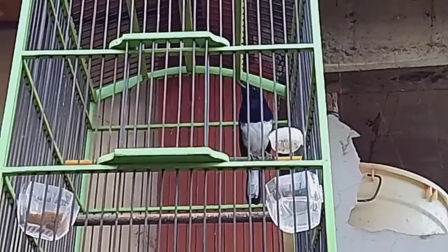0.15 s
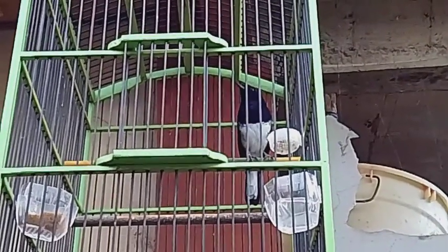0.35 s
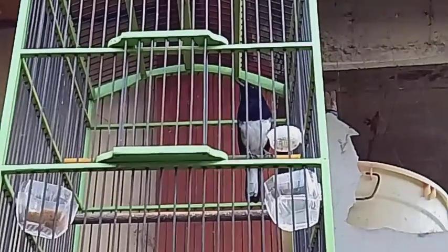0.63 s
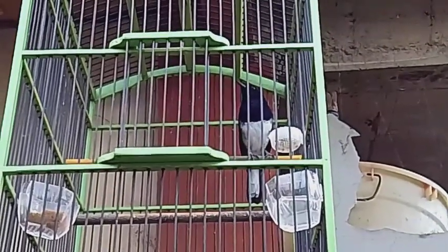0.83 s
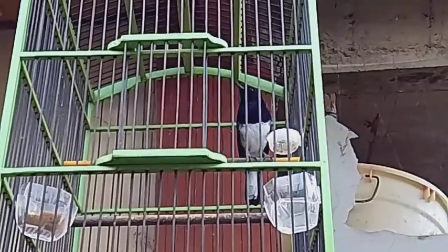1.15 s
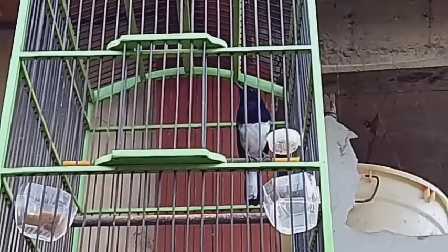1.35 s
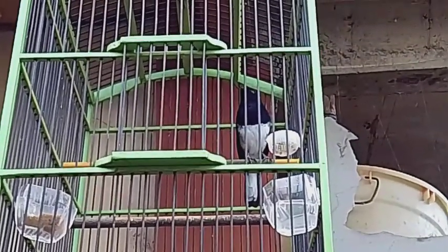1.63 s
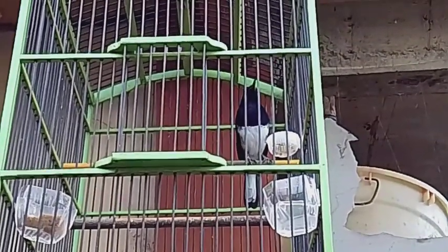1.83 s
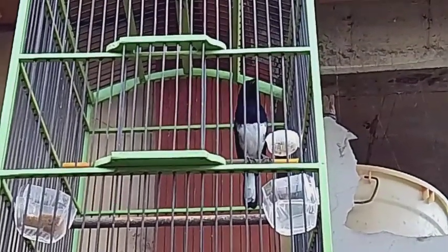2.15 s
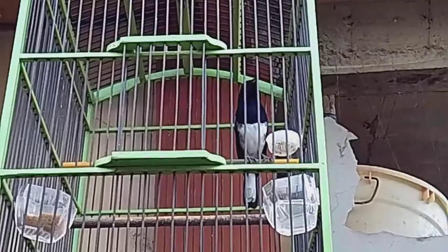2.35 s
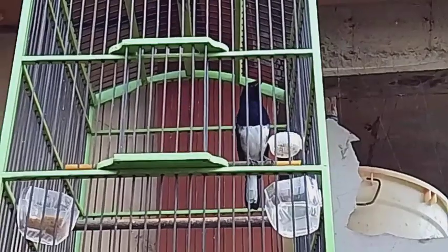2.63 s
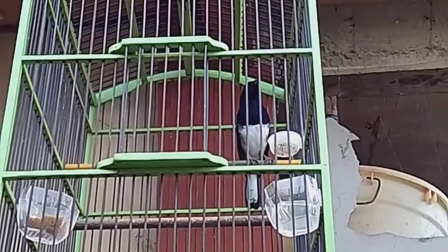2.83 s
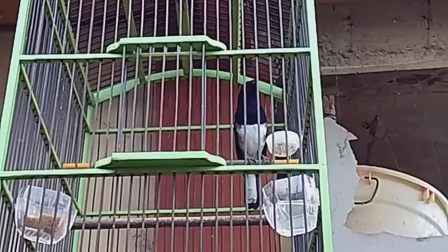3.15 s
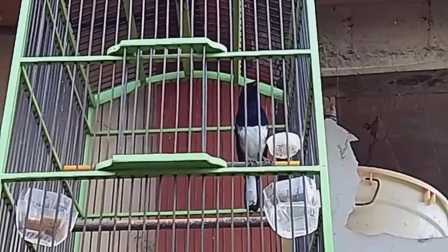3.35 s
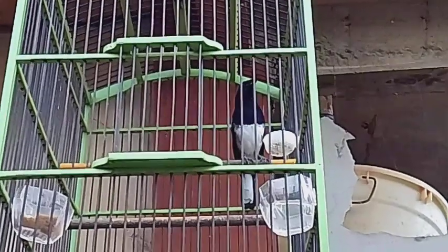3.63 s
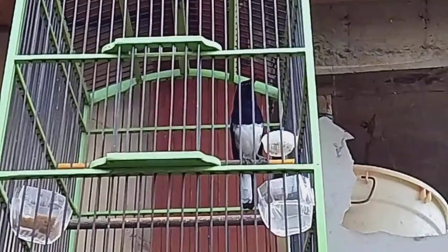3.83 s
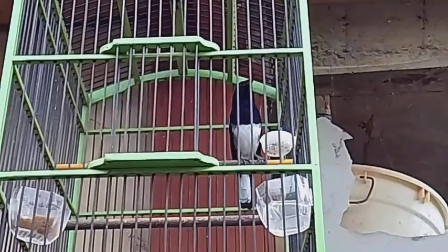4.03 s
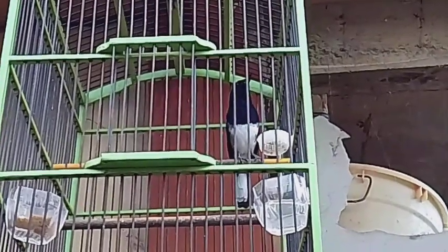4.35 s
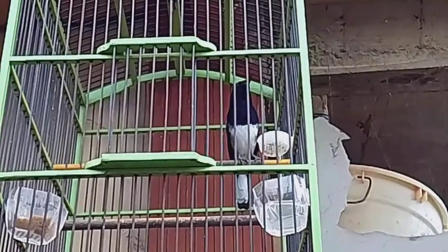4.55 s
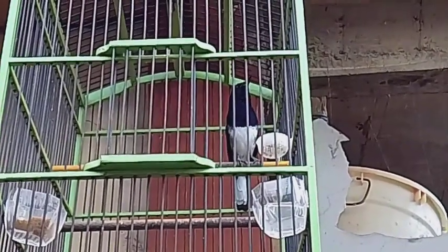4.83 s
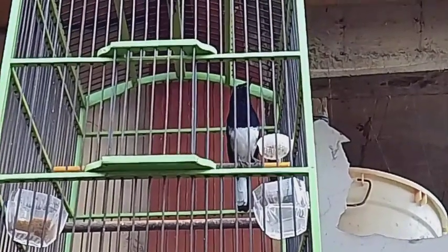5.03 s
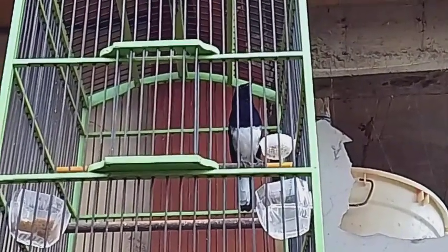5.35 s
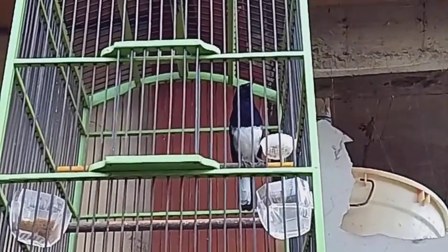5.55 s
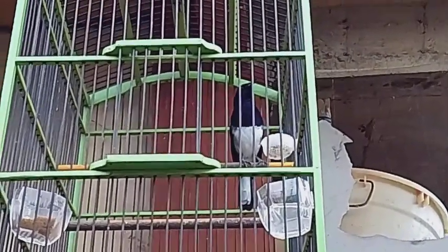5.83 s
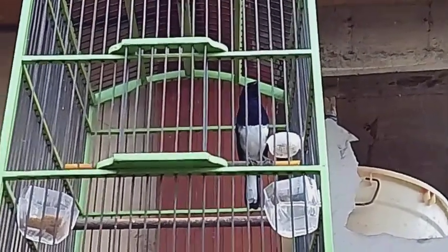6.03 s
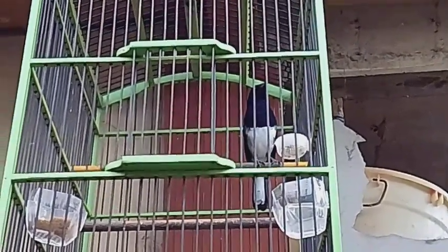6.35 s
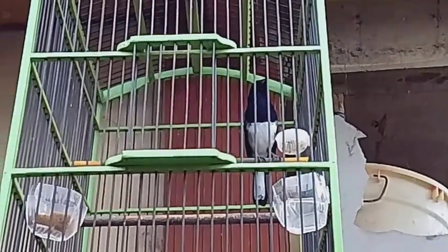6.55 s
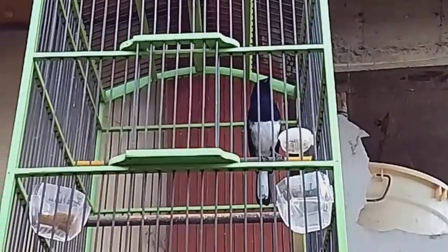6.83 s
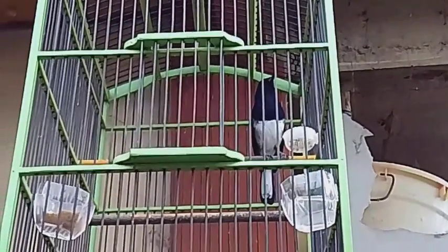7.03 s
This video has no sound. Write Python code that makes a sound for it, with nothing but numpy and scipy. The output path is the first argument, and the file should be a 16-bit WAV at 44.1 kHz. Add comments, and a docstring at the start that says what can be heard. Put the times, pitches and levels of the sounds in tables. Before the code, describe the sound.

Under a roof in a yard, a nearby caged songbird delivers about three seconds of loud, varied song, with gliding whistles, whip-like flicks and raspy notes, briefly echoed by the walls. Before and after it, more distant birds give soft hoarse calls and rising whistles among scattered small ticks. Behind everything, a cicada buzzes thinly and far traffic hums very quietly.

```python
"""Caged magpie-robin under the eaves

A magpie-robin's syrinx glides through one loud phrase of whistles, whips and reedy notes.
Softer calls of other birds fill the pauses, a cicada's drum buzzes high up, a motor hums in far
traffic, and short ticks and clicks sound now and then. Walls and roof throw the song back,
and a limiter flattens its loudest notes."""
import sys
import numpy as np
from scipy import signal
from scipy.fft import rfft, irfft, next_fast_len
from scipy.io import wavfile

SR = 44100
rng = np.random.default_rng(int(sys.argv[2]) if len(sys.argv) > 2 else 0)


def inscribe(sig):
    """Save sig as 16-bit PCM at rate SR to the path in sys.argv[1].

    A 1-D sig is mono; a 2-D sig holds one channel per row.
    Samples are clipped to [-1, 1] before scaling.
    """
    pcm = np.round(np.clip(np.atleast_2d(sig).T, -1, 1) * 32767)
    wavfile.write(sys.argv[1], SR, pcm.astype(np.int16))


N = 317079
TIME = np.arange(N) / SR
CUTOFF_HZ = 15550

# Spectrum of the noise shed by fast sweeps. Each row: frequency in Hz, gain in dB.
AIR_SPECTRUM = [(60, -3), (300, 2), (900, 3), (3000, 11.5), (6000, 1), (10000, 1.5), (15000, -7.5)]


def from_db(db):
    """Amplitude grows tenfold for every 20 dB."""
    return 10 ** (np.asarray(db) / 20)


def unit_rms(x):
    """Normalisation to a mean power of 1."""
    return x / np.sqrt(np.mean(x ** 2) + 1e-20)


def db_at(spectrum, hz):
    """Interpolation of a spectrum on a logarithmic frequency axis."""
    freq, db = np.transpose(spectrum)
    return np.interp(np.log(np.maximum(hz, 1)), np.log(freq), db)


def coloured(x, spectrum):
    """Filtering by multiplication in the frequency domain."""
    size = next_fast_len(len(x))
    gain = from_db(db_at(spectrum, np.fft.rfftfreq(size, 1 / SR)))
    return irfft(rfft(x, size) * gain, size)[:len(x)]


def drift(rate, size):
    """Random modulation: straight lines join `rate` Gaussian values a second."""
    position = np.arange(size) / SR * rate
    count = int(position[-1]) + 2
    return np.interp(position, np.arange(count), rng.standard_normal(count))


def ramp(t, start, length):
    """A linear transition from 0 at `start` to 1 after `length`."""
    return np.clip((t - start) / max(length, 1 / SR), 0, 1)


def note_span(start, length, open_s=.0015, close_s=.003):
    """Tapered edges prevent clicks; gives a note's sample indices, elapsed time and gate."""
    at = np.arange(max(int(start * SR), 0), min(int((start + length) * SR), N))
    t = (at - at[0]) / SR
    edge = np.clip(np.minimum(t / open_s, (t[-1] - t) / close_s), 0, 1)
    return at, t, np.sin(edge * np.pi / 2) ** 2


def phase_of(hz):
    """Phase is the time integral of frequency."""
    return 2 * np.pi * np.cumsum(hz) / SR


def town(traffic_db=-57, motor_hz=340.5, motor_db=-66):
    """Far traffic sums to steady noise; a motor's hum wavers in frequency and amplitude."""
    # Spectrum of the traffic. Each row: frequency in Hz, relative level in dB.
    traffic_spectrum = [(25, -27.5), (70, -10.5), (160, -19), (190, 0.5), (235, -3), (350, 3), (520, -6),
                        (900, -5), (1400, -8), (2800, 1), (4000, -11.5), (6000, -13.5), (9000, -21.5),
                        (13000, -39.5)]
    traffic = from_db(traffic_db) * unit_rms(coloured(rng.standard_normal(N), traffic_spectrum))
    hum = np.sin(phase_of(motor_hz * (1 + .008 * drift(34, N))))
    return traffic + from_db(motor_db + 2 * drift(2.4, N)) * hum


def cicada(pulse_hz=99, level_db=-59.5, lull_db=6, ramp_s=.15):
    """Pulsed excitation: the drum buckles in a fast train of bursts that ring in its resonance."""
    # Resonance of the drum. Each row: frequency in Hz, relative level in dB.
    tymbal_spectrum = [(5000, -33.5), (6400, -12), (7300, -6), (7540, 3), (7750, -5), (8350, -7),
                       (8750, -24), (10500, -40.5), (13000, -45), (15300, -22.5)]
    # Bouts of louder buzzing. Each row: start in seconds, length in seconds.
    bouts = [(0, 0.68), (1.2, .58), (2.328, 1.45), (4.746, .5), (5.864, 0.54), (6.95, .24)]
    cycle = np.cumsum(pulse_hz * (1 + .0083 * drift(11, N))) / SR % 1
    bursts = (.5 + np.exp(-1.8 * cycle)) * rng.standard_normal(N)
    effort = sum(ramp(TIME, start - ramp_s, ramp_s) - ramp(TIME, start + length, ramp_s)
                 for start, length in bouts)
    return from_db(level_db - lull_db * (1 - effort)) * unit_rms(coloured(bursts, tymbal_spectrum))


def ticks(snap_band_hz=(1000, 4000), snap_t60_s=.038, ring_t60_s=.022, rise_s=.00069):
    """Damped transients: each tick is a snap of noise and a ring, both decaying exponentially."""
    # Short ticks and clicks: one at the very start, two as the song begins, and scattered light taps.
    # Each row: start in seconds, ring level in dB, ring pitch in Hz, snap level in dB.
    clicks = [(.002, -28.5, 1836, -33.5), (.477, -26, 785, -25.5), (.49, -38, 690, -42),
              (0.675, -54, 1200, -43), (0.817, -62, 1900, -39), (.904, -34.5, 1850, -35.5),
              (1.529, -41, 1534, -56), (1.578, -34.5, 1680, -38), (1.839, -40.5, 483, -53),
              (2.052, -23.5, 3190, -41), (2.066, -25.5, 2020, -39), (5.376, -26, 2190, -39.5),
              (5.571, -41, 1391, -49.5), (5.857, -33, 1830, -38), (6.171, -46.5, 2450, -39.5),
              (6.889, -43, 1457, -49), (6.964, -41, 3960, -37)]
    out, t = np.zeros(N), TIME[:SR // 5]
    band = signal.butter(2, snap_band_hz, "band", fs=SR, output="sos")
    for start, ring_db, hz, snap_db in clicks:
        snap = signal.sosfilt(band, rng.standard_normal(len(t)) * from_db(-60 * t / snap_t60_s))
        ring = np.sin(2 * np.pi * hz * t) * from_db(-60 * t / ring_t60_s) * (1 - np.exp(-t / rise_s))
        at = int(start * SR)
        out[at:at + len(t)] += from_db(snap_db) * snap + from_db(ring_db) * ring
    return out


def far_chatter(count=220, low_hz=1300, high_hz=4800, length_s=.042, floor_db=-61.25, range_db=9):
    """Fast random frequency modulation makes hoarse scraps of chatter from many faint birds."""
    out, progress = np.zeros(N), np.linspace(0, 1, int(length_s * SR))
    size = len(progress)
    envelope = np.minimum(10 * progress, 1) * (1 - progress)
    for when, pitch, loudness in rng.random((count, 3)):
        hz = low_hz * (high_hz / low_hz) ** pitch * (1 + .13 * drift(2500, size))
        at = int(when * (N - size))
        out[at:at + size] += from_db(floor_db + range_db * loudness) * envelope * np.sin(phase_of(hz))
    return out


def syllable(start, to_turn, after, first_hz, turn_hz, last_hz, db, octave_db, attack, fade_db):
    """A power-law glide flattens at its turning pitch; the level climbs, then fades or swells."""
    at, t, gate = note_span(start, to_turn + after)
    approach = (1 - ramp(t, 0, to_turn)) ** 2.3
    departure = ramp(t, to_turn, after) ** 2.3
    hz = turn_hz + (first_hz - turn_hz) * approach + (last_hz - turn_hz) * departure
    effort_db = -20.5 * (1 - ramp(t, 0, attack)) - fade_db * ramp(t, attack, to_turn + after - attack)
    # The octave follows only part of the swell and fade, so the quiet edges are reedier.
    return at, gate, hz, db + effort_db, octave_db + .44 * effort_db


def chip(start, first_hz, db, length_s=.057, lift=.244, fade_db=20, roughness=.068):
    """A linear upward chirp: a sudden low note lifts as it decays."""
    at, t, gate = note_span(start, length_s)
    hz = first_hz * (1 + lift * t / length_s)
    level_db = db - fade_db * t / length_s
    return at, gate, hz, level_db, level_db - 8, roughness


def riser(start, length, first_hz, db, top_hz=2685, attack_s=.22, roughness=.1):
    """A slow power-law glide: the whistle swells as it climbs and levels off at the top."""
    at, t, gate = note_span(start, length)
    hz = top_hz + (first_hz - top_hz) * (1 - ramp(t, 0, length)) ** 1.3
    level_db = db - 15.5 * (1 - ramp(t, 0, attack_s)) - 3.5 * ramp(t, attack_s, length - attack_s)
    return at, gate, hz, level_db, level_db - 38, roughness


def twitter(start, db, length_s=.1281, first_hz=4160, last_hz=4110, fade_db=9.5, roughness=.36):
    """A shallow downward chirp: a thin rough note sinks as it decays."""
    at, t, gate = note_span(start, length_s)
    hz = first_hz + (last_hz - first_hz) * t / length_s
    level_db = db - fade_db * t / length_s
    return at, gate, hz, level_db, level_db - 21, roughness


def far_birds(rasp=.13, upper_db=-21, flutter_db=2.5):
    """Random frequency modulation roughens soft whistles; harmonics make some of them reedy."""
    # Hoarse calls. Each row: start, time to the turn and time after it in seconds; first, turning and
    # last pitch in Hz; fundamental and octave level in dB; attack in seconds; fade in dB; roughness.
    hoarse_calls = [ (.05, 0.092, 0.061, 2600, 2896, 2990, -44, -56.5, 0.044, 12, 1.14),
                    (.19, 0.17, 0.022, 2046, 2350, 2350, -58.5, -87, 0.018, -6, 0.27),
                    (.31, 0.086, 0.048, 2450, 2600, 2190, -37, -86, 0.056, 1.5, 0.18),
                    (4.422, 0.018, 0.049, 3100, 3070, 2850, -31.5, -47, 0.058, -1.5, 0.54),
                    (5.151, 0.027, 0.095, 2080, 2029, 1725, -44, -77, 0.012, 8, 0.02),
                    (5.781, 0.1, 0.011, 2650, 2249, 2460, -46, -79, 0.036, 6, 0.22),
                    (5.855, 0.0196, 0.052, 2535, 2503, 2136, -46, -70.5, 0.014, -4, 0.31),
                    (6.356, 0.042, 0.089, 2864, 2940, 2477, -35.5, -54, 0.033, 11, 0.07),
                    (6.45, .07, 0.0367, 2750, 2530, 2577, -43.5, -45, 0.026, 0.5, 0.26),
                    (7.1, 0.076, 0.0066, 2380, 2563, 2600, -39, -61, 0.11, 7, 0.24), ]
    # Low chips. Each row: start in seconds, first pitch in Hz, level in dB.
    chips = [(0.057, 1007, -46.5), (0.814, 936, -46.5), (6.1, 994, -51), (6.528, 1451, -40),
             (6.89, 1018, -46.5)]
    # Rising whistles. Each row: start and length in seconds, first pitch in Hz, level in dB.
    risers = [(0.989, .375, 1762, -36.5), (6.468, .42, 1698, -39)]
    # Thin twitters. Each row: start in seconds, level in dB.
    twitters = [(5.758, -61.5), (6.02, -60.5), (6.279, -56.5)]
    calls = [(*syllable(*row), roughness) for *row, roughness in hoarse_calls]
    calls += [riser(*row) for row in risers]
    calls += [chip(*row) for row in chips]
    calls += [twitter(*row) for row in twitters]
    out = np.zeros(N)
    for at, gate, hz, fundamental_db, octave_db, roughness in calls:
        phase = phase_of(hz * (1 + rasp * roughness * drift(700, len(at))))
        overtones = np.sin(2 * phase) + from_db(upper_db) * (np.sin(3 * phase) + np.sin(4 * phase))
        voice = from_db(fundamental_db) * np.sin(phase) + from_db(octave_db) * overtones
        flutter = from_db(flutter_db * drift(50, len(at)))
        out[at] += np.sqrt(2) * gate * flutter * voice
    return out


def long_whistle(start, length, top_hz, low_hz, scoop_hz, octave_db, levels,
                 first_hz=2543, rise_s=.112, sag_hz_per_s=1080, droop_s=.135, scoop_s=.03):
    """Slow frequency modulation: a rise, sag, droop and scoop; the octave grows towards the end."""
    at, t, gate = note_span(start, length)
    rise = np.sin(np.pi / 2 * ramp(t, 0, rise_s)) ** 2
    sag_hz = sag_hz_per_s * np.clip(t - rise_s, 0, length - droop_s - rise_s)
    droop = ramp(t, length - droop_s, droop_s - scoop_s)
    scoop = ramp(t, length - scoop_s, scoop_s) ** 2
    held_hz = first_hz + (top_hz - first_hz) * rise - sag_hz
    hz = held_hz + (low_hz - held_hz) * droop + scoop_hz * scoop
    onset_db = -2 * (1 - ramp(t, 0, .048))
    fundamental_db = onset_db + np.interp(at / SR, *np.transpose(levels))
    return at, gate, hz, fundamental_db, octave_db + onset_db + 6 * (droop + scoop)


def magpie_robin(tremor_db=2, flutter_db=4, buzz_db=-16, db_per_harmonic=-1.5, air_db=-39):
    """Source and filter: the syrinx glides; the throat passes the fundamental or a reedy octave."""
    # Long whistles that open and close the phrase. Each row: start and length in seconds,
    # top pitch, lowest pitch and final lift in Hz, octave level in dB.
    whistles = [(2.06, .465, 2827, 2159, 450, -51), (4.453, .485, 2789, 2283, 153, -50)]
    # One envelope for each whistle. Each point: time in seconds, level in dB.
    envelopes = [
        [(2.06, -37.5), (2.084, -21.5), (2.136, -8), (2.352, -10), (2.358, -22), (2.4, -9), (2.412, -21),
         (2.51, -26), (2.52, -13.5)],
        [(4.455, -25), (4.503, -13), (4.643, -6), (4.701, -25.5), (4.715, -12.5), (4.767, -29.5), (4.781, -11),
         (4.887, -25), (4.935, -23)],
    ]
    # Quick syllables. Each row: start, time to the turn and time after it in seconds; first, turning
    # and last pitch in Hz; fundamental and octave level in dB; attack in seconds; fade in dB.
    syllables = [ (2.523, 0.016, 0.019, 2606, 3722, 2830, -3.5, -50, 0.0068, 8),
                 (2.7273, 0.03, 0.0079, 3573, 2343, 2550, 1, -36.5, 0.0032, 13.5),
                 (2.782, 0.028, 0.0035, 2830, 1595, 1600, -6, -42, 0.0031, 35),
                 (2.985, 0.022, 0.066, 1280, 1472, 1282, -36.5, -44.5, 0.0075, -4),
                 (3.058, 0.021, 0.042, 1297, 1378, 1244, -31, -28.5, 0.026, 6),
                 (3.077, 0.027, 0.011, 1494, 1660, 1700, -40.5, -28.5, 0.0062, 4.5),
                 (3.092, 0.062, 0.06, 1890, 2075, 2044, -10.5, -56.5, 0.021, 5),
                 (3.222, 0.0037, 0.039, 1675, 1837, 2446, -20, -44.5, 0.021, -2.5),
                 (3.266, 0.039, 0.1, 2367, 2617, 2490, -1.5, -48, 0.019, 14.5),
                 (3.49, 0.024, 0.027, 2930, 2966, 2750, -40.5, -53.5, 0.022, 2.5),
                 (3.5393, .016, .029, 1476, 1649, 1466, -28.5, -18.5, 0.0031, 0.5),
                 (3.583, 0.0095, 0.044, 1743, 1958, 1554, -23, -34, 0.012, 4.5),
                 (3.635, 0.0036, .012, 2790, 3197, 1806, 2.5, -34.5, 0.0043, 9.5),
                 (3.654, 0.018, 0.023, 1730, 1732, 1582, -26, -13.5, 0.0071, 3),
                 (3.826, .022, 0.01, 1164, 1879, 1858, -24.5, -7.5, 0.028, 5),
                 (3.854, .017, 0.012, 1716, 1737, 1600, -23, -6.5, 0.004, 4.5),
                 (3.872, 0.059, 0.051, 2660, 2817, 2355, 0, -39.5, 0.017, 9.5),
                 (4.002, .028, .028, 2643, 3221, 2755, -1, -50.5, 0.023, 3.5),
                 (4.055, 0.0058, 0.039, 2680, 2558, 2386, -12, -38.5, 0.0029, -1.5),
                 (4.091, 0.0029, 0.019, 2450, 2410, 1590, -5.5, -36, 0.0047, 21),
                 (4.149, 0.087, .035, 5460, 5835, 5710, -63.5, -82, 0.013, -17.5),
                 (4.238, 0.035, 0.0084, 3610, 5636, 5100, -15.5, -46, 0.0029, 7),
                 (4.28, 0.031, 0.018, 4200, 2504, 2320, -1, -44.5, 0.0043, 8),
                 (4.33, 0.015, .018, 2533, 2794, 2410, -11.5, -46, 0.0099, 7.5),
                 (4.938, 0.016, 0.011, 2400, 3431, 3000, -2.5, -56, 0.011, 15), ]
    # Weighting of the harmonics above the octave. Each row: frequency in Hz, gain in dB.
    overtone_spectrum = [(3500, -14.5), (4900, -21.5), (6600, -32.5), (8300, -29.5), (10500, -30),
                         (12200, -42), (13800, -29.5), (15500, -40.5)]
    notes = [long_whistle(*row, levels) for row, levels in zip(whistles, envelopes)]
    notes += [syllable(*row) for row in syllables]
    out = np.zeros(N)
    for at, gate, hz, fundamental_db, octave_db in notes:
        fundamental = from_db(fundamental_db + tremor_db * drift(60, len(at)))
        octave = from_db(octave_db + tremor_db * drift(60, len(at)))
        # Held notes are nearly pure; reedy ones rasp; fast sweeps are unsteady and shed noise.
        sweep = np.tanh(np.abs(np.gradient(np.log(hz))) * SR / 35)
        reediness = octave / (fundamental + octave)
        waver = .0022 + .018 * sweep + .0099 * reediness
        hz = hz * (1 + waver * drift(430, len(at)))
        phase = phase_of(hz)
        voice = fundamental * np.sin(phase) + octave * np.sin(2 * phase)
        buzz = octave + from_db(buzz_db) * fundamental   # reedy notes carry far more overtones
        for k in range(3, 10):
            overtone_db = db_at(overtone_spectrum, k * hz) + db_per_harmonic * (k - 2)
            overtone_db += flutter_db * drift(80, len(at))
            voice += buzz * from_db(overtone_db) * (k * hz < CUTOFF_HZ) * np.sin(k * phase)
        air = coloured(rng.standard_normal(len(at)), AIR_SPECTRUM)
        voice += from_db(air_db) * (fundamental + octave) * sweep * air
        out[at] += np.sqrt(2) * gate * voice
    return out


def whip_cracks():
    """Broadband transients: the hardest flicks of the song break into short bursts of noise."""
    # Gaussian bursts. Each row: centre in seconds, level in dB, half width in seconds.
    cracks = [(2.53, -28, 0.0019), (2.728, -34.5, 0.0015), (2.79, -39.5, .003), (4.03, -34.5, 0.012),
              (4.095, -39.5, 0.0024), (4.285, -26, 0.0061)]
    envelope = sum(from_db(db) * np.exp(-((TIME - centre) / width) ** 2) for centre, db, width in cracks)
    return envelope * unit_rms(coloured(rng.standard_normal(N), AIR_SPECTRUM))


def reflections(x, smear=.11):
    """Echoes interfere with a gliding whistle; bars and rough walls scatter the later ones most."""
    # Echoes from roof and walls. Each row: delay in seconds, relative level in dB.
    echoes = [(.0037, -13.5), (.0089, -0.5), (0.0172, -5.5), (0.022, -10), (0.0345, -21), (0.0432, -22),
              (0.0618, -17.5)]
    response, t = np.zeros(SR // 5), TIME[:SR // 30]
    for delay, db in echoes:
        burst = rng.standard_normal(len(t)) * np.exp(-t / (smear * delay))
        at = int(delay * SR)
        response[at:at + len(t)] += from_db(db) * burst / np.linalg.norm(burst)
    return signal.fftconvolve(x, response)[:N]


def reverberation(x, t60_s, build_s, grain_db):
    """The yard's diffuse field: uneven clumps of echoes build up, then decay exponentially."""
    # Colour of the reverberation. Each row: frequency in Hz, gain in dB.
    yard_spectrum = [(200, -14.5), (1500, 0.5), (3000, 0), (5500, -2.5), (9000, 0.5), (15000, -10.5)]
    t = TIME[:SR]
    tail = rng.standard_normal(SR) * from_db(grain_db * drift(360, SR) - 60 * t / t60_s)
    tail *= 1 - np.exp(-t / build_s)
    response = coloured(tail / np.linalg.norm(tail), yard_spectrum)[:SR * 9 // 10]
    return signal.fftconvolve(x, response)[:N]


def scene():
    """Superposition: the singer is close; other birds and ticks arrive largely by way of the walls."""
    near = magpie_robin() + whip_cracks()
    far = far_birds() + far_chatter() + ticks()
    mix = near + from_db(-4) * reflections(near)
    mix += from_db(-11) * reverberation(near, t60_s=.38, build_s=.0098, grain_db=2)
    mix += from_db(-2.5) * far + from_db(-4.5) * reflections(far)
    mix += from_db(-6) * reverberation(far, t60_s=.5, build_s=.0012, grain_db=-1.5)
    return (mix + cicada() + town())[None]


def limiter(x, ceiling_db=-7, release_db_per_s=200, attack_s=.00017):
    """Peak limiting: the gain drops quickly on peaks over the ceiling and soon recovers."""
    excess_db = np.maximum(20 * np.log10(np.abs(x) + 1e-9) - ceiling_db, 0)
    release_db = release_db_per_s * TIME
    held_db = np.maximum.accumulate(excess_db + release_db, axis=-1) - release_db
    pole = np.exp(-1 / (attack_s * SR))
    return x * from_db(-signal.lfilter([1 - pole], [1, -pole], held_db))


def record(dry):
    """Limiting flattens the loud notes, and a steep low-pass filter cuts the highest treble."""
    lowpass = signal.ellip(12, .1, 90, CUTOFF_HZ, fs=SR, output="sos")
    return signal.sosfilt(lowpass, limiter(dry))


dry = scene()
out = record(dry)
inscribe(out)
```